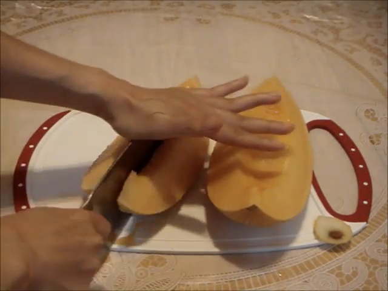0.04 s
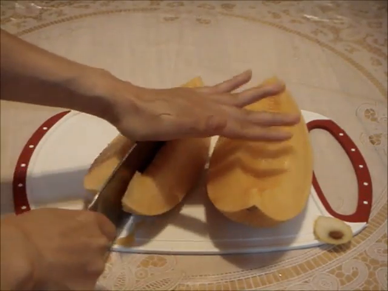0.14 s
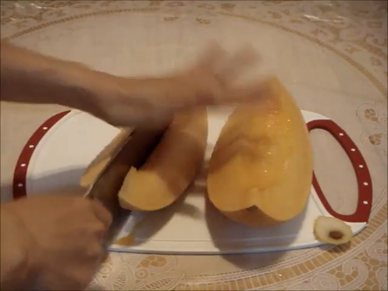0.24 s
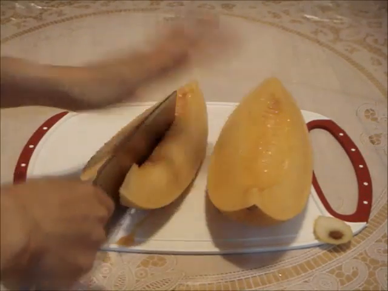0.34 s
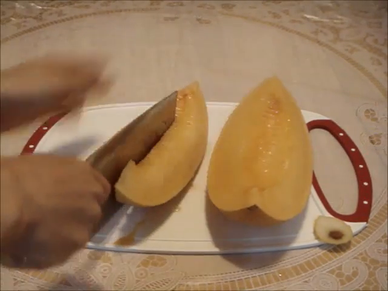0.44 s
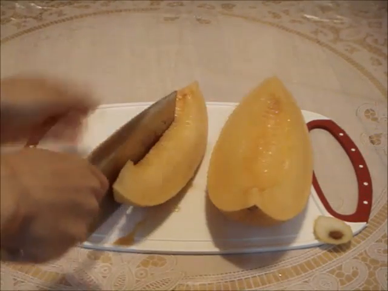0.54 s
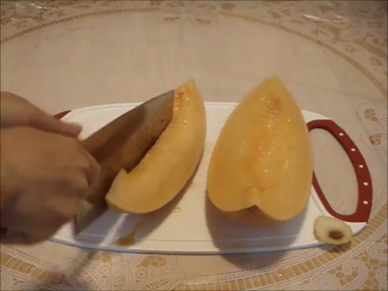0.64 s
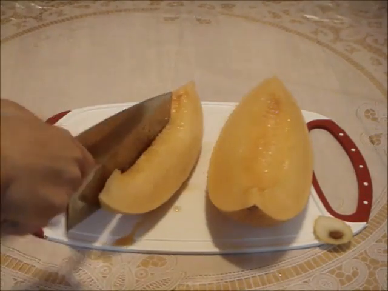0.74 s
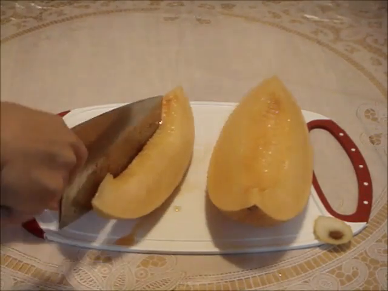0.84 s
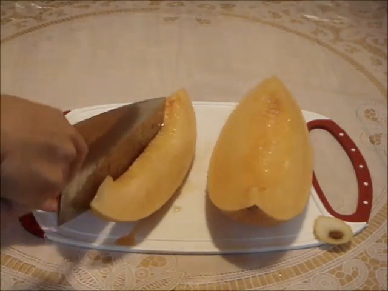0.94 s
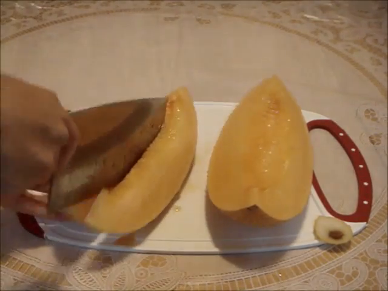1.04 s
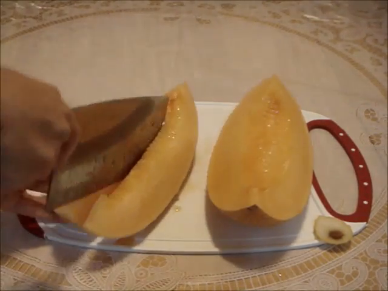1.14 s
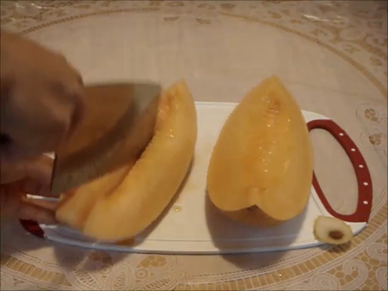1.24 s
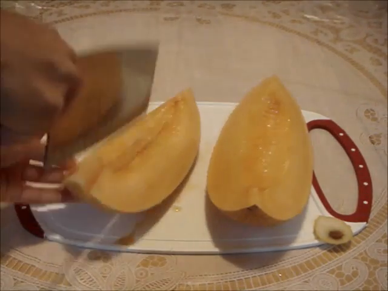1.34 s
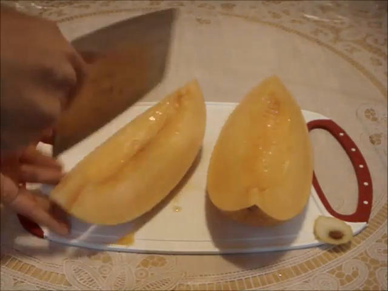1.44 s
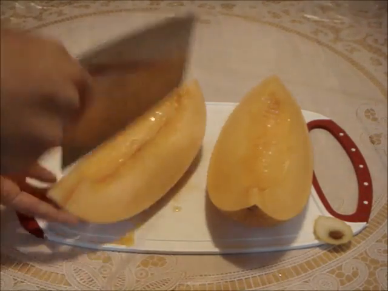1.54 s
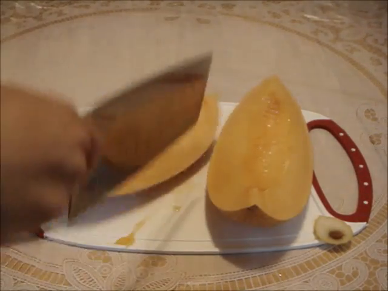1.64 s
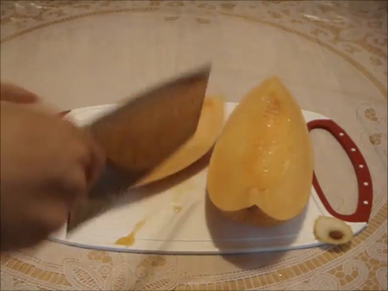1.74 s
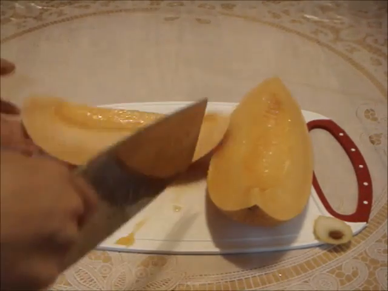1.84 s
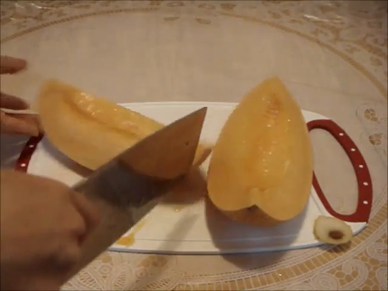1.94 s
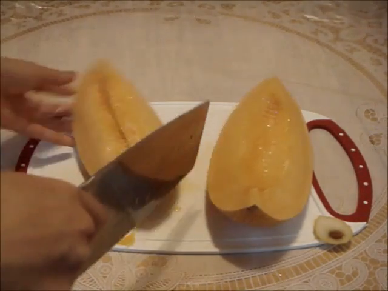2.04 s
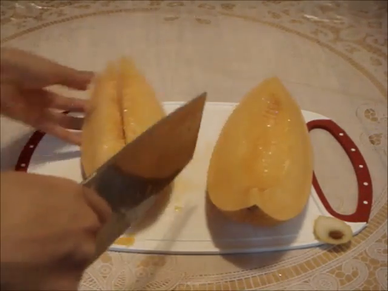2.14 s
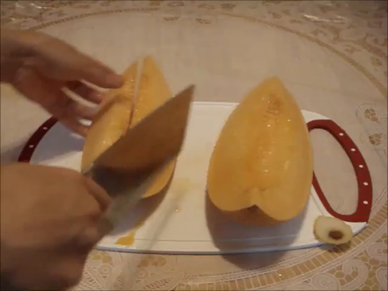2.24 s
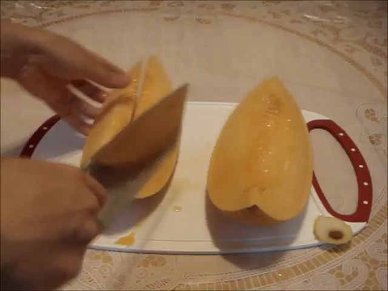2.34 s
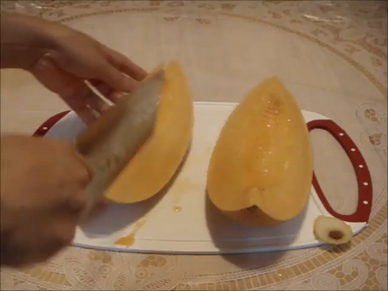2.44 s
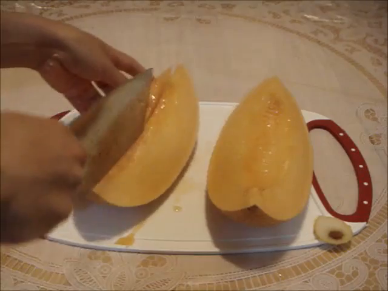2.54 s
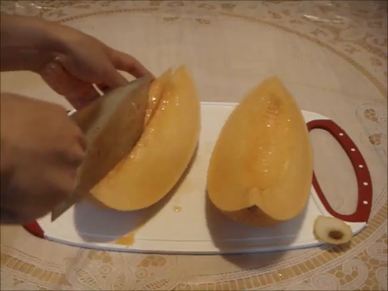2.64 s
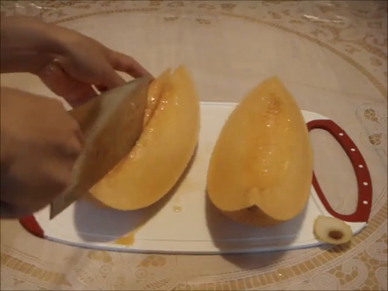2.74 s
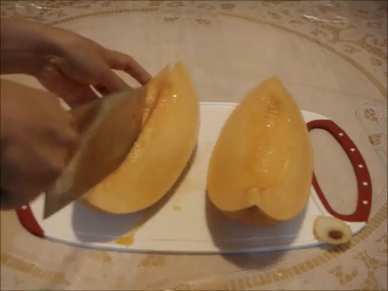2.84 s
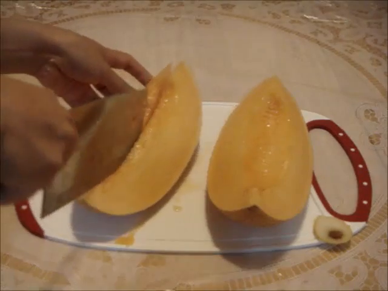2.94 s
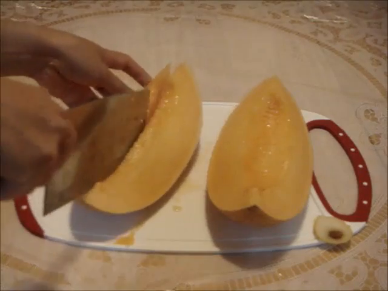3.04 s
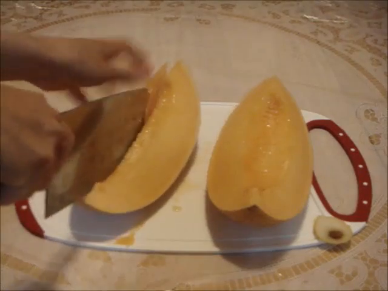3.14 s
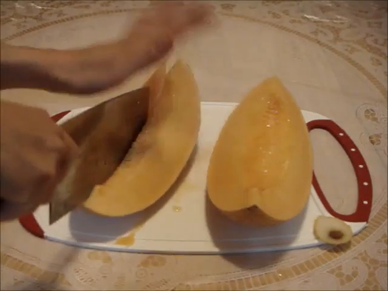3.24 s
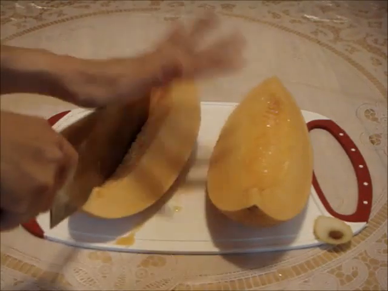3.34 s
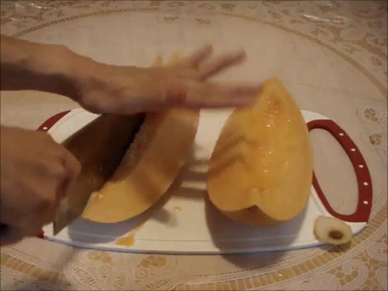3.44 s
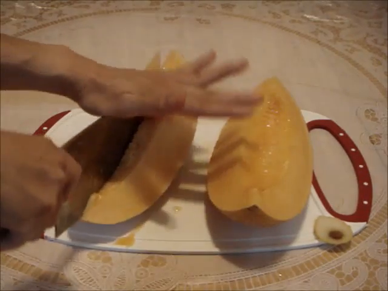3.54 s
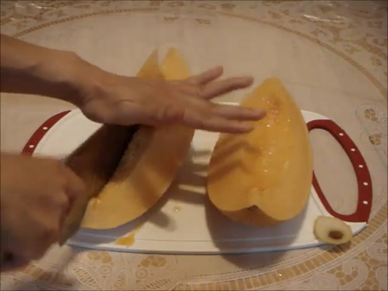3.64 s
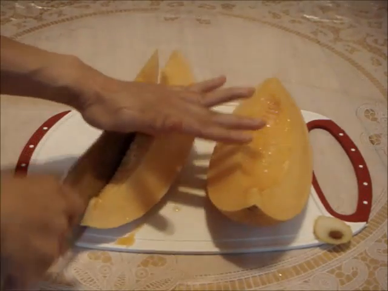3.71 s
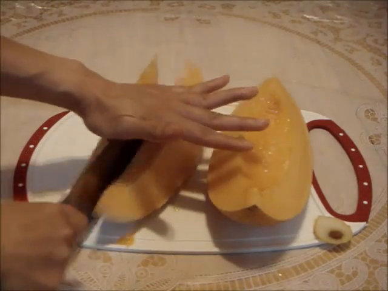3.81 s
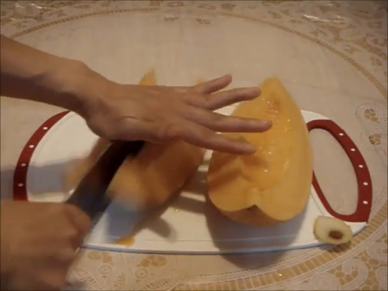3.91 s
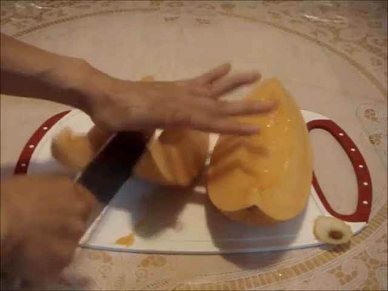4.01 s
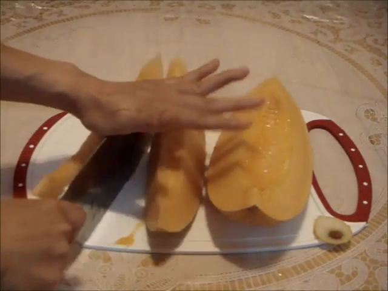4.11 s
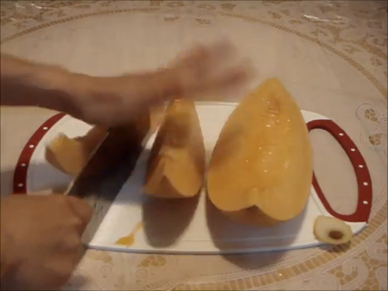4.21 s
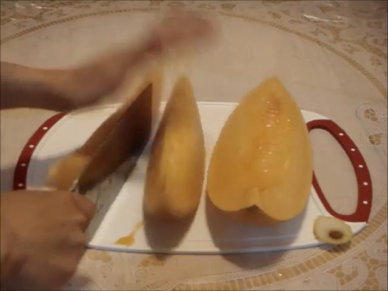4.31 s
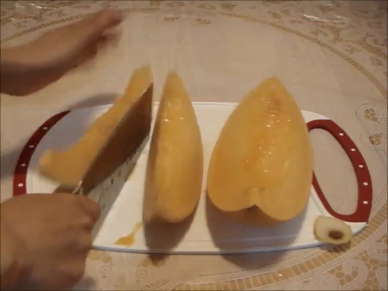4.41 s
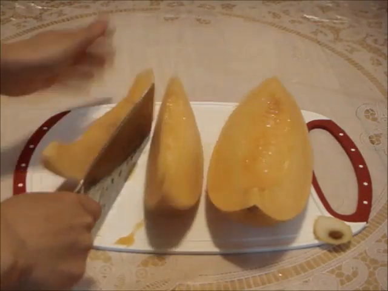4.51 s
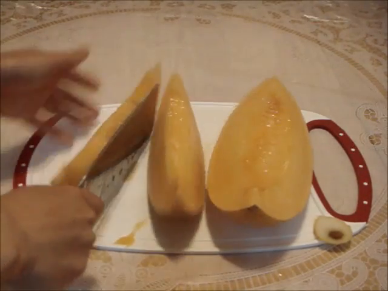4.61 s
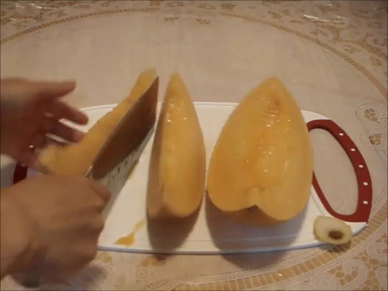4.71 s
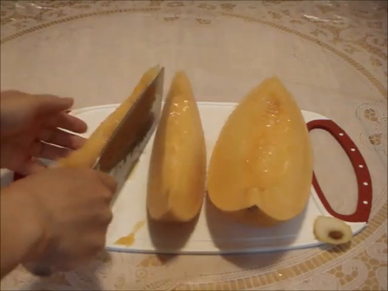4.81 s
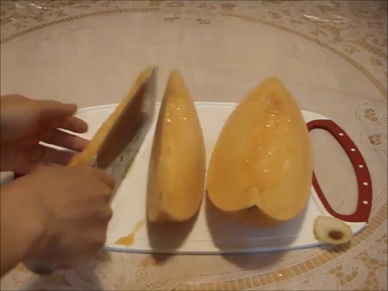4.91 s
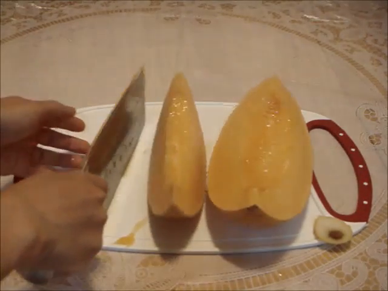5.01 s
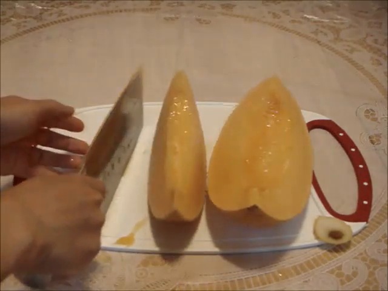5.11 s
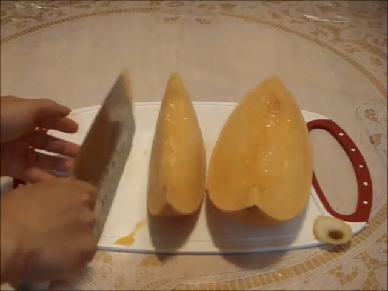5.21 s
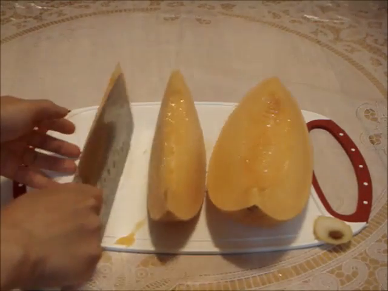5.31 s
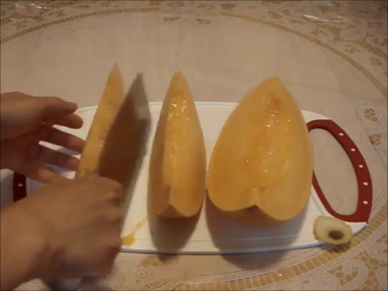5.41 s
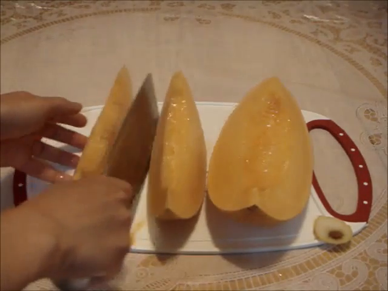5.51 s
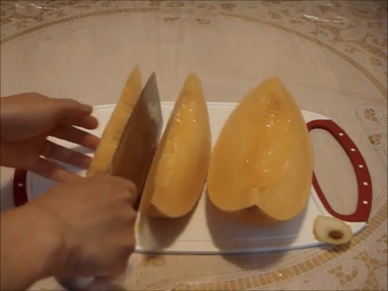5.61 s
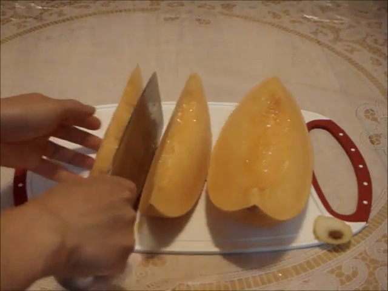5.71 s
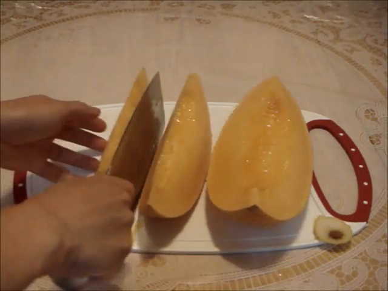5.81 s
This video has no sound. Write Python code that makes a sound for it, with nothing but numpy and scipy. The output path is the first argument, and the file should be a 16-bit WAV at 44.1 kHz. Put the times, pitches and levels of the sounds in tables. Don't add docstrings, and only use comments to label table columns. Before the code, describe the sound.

A broad knife cuts melon on a plastic board on a table in an echoing kitchen, heard close through a small camera microphone with steady soft hiss and dull upper treble. At 0 s a loud chop is already dying away, a woody mid-range knock with low table hum and short room echo. From about 0.35 to 2.2 s there is only quiet handling: sparse dry ticks, clustered around 0.7 and 1.6 s, and faint wet rubs. A near-quiet gap follows. From 3.4 s soft table thumps begin; flesh tears lightly, a knock lands at 3.65, and the rind cracks with a crisp, crunchy burst peaking near 3.85. At 4.15 the edge lands in a quick double tap with a soft slide. From 4.7 s the edge drags over the board in short, gritty strokes, hissing plastic and thin singing steel, strongest around 5.0 and 5.45 s, the last falling in pitch and fading by 5.7.

```python
import sys
import numpy as np
from scipy import signal
from scipy.fft import rfft, irfft
from scipy.io import wavfile
from scipy.ndimage import uniform_filter1d

SR = 44100
rng = np.random.default_rng(int(sys.argv[2]) if len(sys.argv) > 2 else 0)


def elevation(decibels):
    levels = np.asarray(decibels, float)
    return 10 ** (levels / 20)


def generate_wav(signal):
    frames = np.transpose(np.atleast_2d(signal))
    scaled = np.clip(frames, -1, 1) * 32767
    pcm = np.round(scaled).astype(np.int16)
    wavfile.write(sys.argv[1], SR, pcm)


N = 258426
LEAD_S = 0.1
CHOP_S, CHOP_THUMP_DB = -0.02, -14

# f/Hz, level/dB
CHOP_COLOUR = [(120, -49), (350, -1), (550, -3), (800, 2.5), (1100, -0.5), (1500, -8), (2000, -7),
               (2600, -14.5), (4500, -15), (9800, -32.5), (12000, -75)]
# f/Hz, level/dB, T60/s
TABLE_MODES = [(130.9, 0, 0.51), (159.8, 2, 0.27), (233.5, -18.5, 0.68)]
# f/Hz, level/dB, T60/s
BOARD_MODES = [(257.3, -9, 0.15), (352.2, -1.5, 0.072), (489, -3.5, 0.044), (620, -3.5, 0.062),
               (769, -3.5, 0.036), (875, -6, 0.03)]
# t/s, level/dB
JOLTS = [
    (0.0, -38),
    (0.15, -49),
    (0.614, -62),
    (3.66, -77),
    (3.902, -47.5),
    (4.168, -44.5),
    (4.67, -68),
    (4.856, -68),
]
# t/s, thump level/dB
NUDGES = [(3.401, -55), (3.799, -34), (3.882, -31), (4.23, -32), (4.584, -50.5), (4.985, -46), (5.1, -48),
          (5.207, -52.5), (5.288, -67), (5.435, -48), (5.519, -46), (5.606, -39.5)]
# f/Hz, T60/s
ROOM_DECAY = [(60, 0.23), (200, 0.57), (700, 0.63), (3000, 0.58), (6000, 0.53), (10000, 0.34)]
# f/Hz, level/dB
HISS_COLOUR = [(24, -49), (40, -9), (325, -2), (391, -3.5), (492, -4.5), (527, -3.5), (564, -4.5),
               (2410, -11.5), (6180, -15), (9800, -22), (12700, -60), (21600, -120)]
# t/s, level/dB, f/Hz
TICKS = [(0.3544, -33, 3200), (0.6753, -33, 2600), (0.7434, -35, 2970), (0.79, -44, 4210),
         (1.1795, -36.5, 2050), (1.3037, -36.5, 2940), (1.4492, -42, 2370), (1.5685, -31, 1540),
         (1.6204, -30.5, 1680), (1.648, -37, 1500), (2.0394, -50, 2310), (2.1586, -50, 2150),
         (3.595, -28, 3900), (3.744, -30, 2850), (3.795, -14, 2310), (4.3894, -36.5, 2150),
         (4.6986, -43, 2170)]
# t/s, length/s, level/dB
RUBS = [
    (0.662, 0.056, -44.5),
    (0.845, .11, -45),
    (1.411, .11, -49.5),
    (1.577, 0.073, -53),
    (1.745, .18, -44),
    (4.135, .18, -42),
]
# f/Hz, level/dB
RUB_COLOUR = [(500, -13), (1500, 3.5), (3500, 4), (6500, 0), (9000, -13), (11000, -41)]
# t/s, force level/dB
TEARS = [
    [(3.45, -54.5), (3.574, -55.5), (3.65, -38), (3.7, -51.5)],
    [(3.7, -52), (3.75, -37), (3.79, -37.5), (3.80, -28.5), (3.83, -29), (3.848, -15.5), (3.864, -13),
     (3.888, -24), (3.93, -46)],
]
# f/Hz, level/dB
RIND_COLOUR = [(88, -52), (150, -63), (360, 1.5), (444, -26.5), (620, -8.5), (776, -4.5), (1100, -4.5),
               (1960, -10), (3950, -8.5), (7540, -12), (9800, -25), (12700, -47), (21600, -120)]
# t/s, edge tick level/dB, table thump level/dB, board knock level/dB, tick f/Hz
BLOWS = [
    (3.657, -21.5, -26, -28.5, 2300),
    (4.146, -36, -38, -37, 2530),
    (4.166, -24, -26, -27, 2620),
]
# t/s, pressure level/dB
DRAGS = [
    [(4.68, -54.5), (4.786, -44), (4.838, -41.5), (4.874, -39), (4.95, -50.5)],
    [(4.95, -54.5), (4.97, -46), (5.0, -32.5), (5.025, -30.5), (5.064, -50), (5.12, -42), (5.2, -50.5)],
    [(5.19, -48), (5.222, -44.5), (5.3, -42.5), (5.345, -51.5)],
    [(5.414, -64), (5.428, -33), (5.45, -23.5), (5.49, -29), (5.514, -30), (5.6, -31), (5.7, -62.5)],
]
# held ring level/dB, free ring level/dB, start scrape f/Hz, end scrape f/Hz
GRIPS = [
    (-10.5, -25, 1750, 1700),
    (-9, -8, 1660, 2400),
    (-6.5, -28, 1800, 1800),
    (-11.5, -15.5, 3160, 830),
]
# f/Hz, level/dB
SCRAPE_COLOUR = [(300, -37), (600, -12), (1000, -0.5), (1600, -2.5), (3300, -3.5), (4500, -8.5),
                 (5300, -12.5), (7700, -15.5), (9800, -27), (12000, -74)]
# f/Hz, width/Hz, level/dB
HELD_MODES = [(3366, 47, -0.5), (4400, 41, -13), (6070, 43, -11), (6250, 23, -11), (7730, 39, -12),
              (7620, 83, -16.5), (2054, 41, -11)]
# f/Hz, width/Hz, level/dB
FREE_MODES = [(2802, 9.4, 3.5), (4610, 18, -13), (4695, 29, -4), (5830, 80, -15), (6850, 45, -22),
              (8570, 40, -24)]
# t/s, board weight level/dB, length/s
LEANS = [
    (4.72, 1, 0.14),
    (4.977, 4, 0.033),
    (5.11, 0.5, 0.17),
    (5.284, 1.5, 0.19),
    (5.554, -7, 0.15),
]


def evened(x):
    return x / np.sqrt(np.mean(x ** 2) + 1e-20)


def read(points, hz):
    f, value = np.transpose(points)
    return np.interp(np.log(hz + 1), np.log(f + 1), value)


def silence():
    return np.zeros(N + round(LEAD_S * SR))


def add(mix, s, sound):
    part = mix[round((s + LEAD_S) * SR):][:len(sound)]
    part += sound[:len(part)]


def unroll(rows):
    s, level_db = np.transpose(rows)
    t = np.arange(s[0], s[-1], 1 / SR)
    return s[0], np.interp(t, s, level_db), signal.windows.tukey(len(t), 400 / len(t))


def band(x, order, edges_hz):
    return signal.sosfilt(signal.butter(order, edges_hz, "band", fs=SR, output="sos"), x)


def coloured(x, spectrum):
    gain = elevation(read(spectrum, np.fft.rfftfreq(len(x), 1 / SR)))
    return evened(irfft(rfft(x) * gain, len(x)))


def wander(size, smooth):
    return evened(uniform_filter1d(rng.standard_normal(size), smooth))


def grit(size, per_s, spread_db):
    heights = elevation(spread_db * np.minimum(rng.exponential(1, size), 4)) * rng.standard_normal(size)
    return evened(heights * (rng.random(size) < per_s / SR))


def resonate(x, hz, width):
    r, turn = np.exp(-np.pi * width / SR), 2 * np.pi * hz / SR
    return signal.lfilter([1 - r], [1, -2 * r * np.cos(turn), r * r], x) * 2 * np.sin(turn)


def glide(x, hz, width):
    turn = np.exp(2j * np.pi * np.cumsum(hz) / SR)
    r = np.exp(-np.pi * width / SR)
    return 2 * (turn * signal.lfilter([1 - r], [1, -r], x / turn)).real


def ring(modes, spread_db):
    t = np.arange(SR // 2) / SR
    return sum(elevation(db + spread_db * rng.standard_normal() - 60 * t / t60) * np.sin(2 * np.pi * hz * t)
               for hz, db, t60 in modes)


def chop():
    out, t = silence(), np.arange(SR // 4) / SR
    slam = coloured(rng.standard_normal(len(t)), CHOP_COLOUR)
    add(out, CHOP_S - 0.03, elevation(-1.5 - 60 * t / 0.23) * slam)
    add(out, CHOP_S, elevation(-9.5) * ring(BOARD_MODES, 0))
    return out


def table():
    out = silence()
    rise = 1 - np.exp(-np.arange(SR // 2) / SR / 0.0038)
    thumps = [(CHOP_S, CHOP_THUMP_DB)] + [(blow[0], blow[2]) for blow in BLOWS] + NUDGES
    for s, thump_db in thumps:
        add(out, s, elevation(thump_db - 0.5) * rise * ring(TABLE_MODES, 0.24))
    return out


def shake():
    rest_db, wobble_db = -78, 3.5
    rise_db_per_s, fall_db_per_s = 245, 88.5
    t = np.arange(N) / SR
    level = elevation(rest_db + wobble_db * wander(N, 4000))
    for s, db in JOLTS:
        away_db = np.where(t < s, rise_db_per_s * (s - t), fall_db_per_s * (t - s))
        level = level + elevation(db - away_db)
    rumble = [(10, -20), (25, 14.5), (45, -3), (85, -0.5), (115, -41), (300, -76)]  # f/Hz, level/dB
    return level * coloured(rng.standard_normal(N), rumble)


def room(x):
    turn, out = 2 * np.pi * np.arange(len(x)) / SR * 7, np.zeros(len(x))
    for k in range(3):
        taps = np.zeros(SR)
        at = np.arange(200, SR - 12, 12) + rng.integers(0, 12, (SR - 201) // 12)
        taps[at] = rng.choice([-1., 1.], len(at))
        hz, t, z = signal.stft(taps, SR, nperseg=256)
        decay = elevation(-60 * t / read(ROOM_DECAY, hz)[:, None])
        tail = signal.istft(z * decay, SR, nperseg=256)[1]
        share = np.sqrt(2 / 3) * np.cos(turn + k * np.pi / 3)
        out += signal.fftconvolve(x * share, tail / np.linalg.norm(tail))[:len(x)]
    return out


def hiss():
    flicker = elevation(0.5 * wander(N, 1500))
    return elevation(-51.5) * flicker * coloured(rng.standard_normal(N), HISS_COLOUR)


def ticks():
    octaves, snap = 1.17, 4.5
    out, t = silence(), np.arange(4000) / SR
    decay = elevation(-60 * t / 0.0084) + 0.13 * elevation(-60 * t / 0.063)
    for s, db, hz in TICKS:
        edges_hz = np.clip(hz * 2. ** np.array([-octaves, octaves]), 300, 9900)
        puff = band(snap * (t == 0) + rng.standard_normal(len(t)), 3, edges_hz)
        add(out, s, elevation(db - 8) * decay * evened(puff))
    return out


def rubs():
    peak_share, ends_db = 0.26, -16
    out = silence()
    for s, length, db in RUBS:
        u = np.linspace(0, 1, round(length * SR))
        arch = np.interp(u, [0, peak_share, 1], [1, 0, 1]) ** 2
        slide = coloured(grit(8000, 9000, 0.73), RUB_COLOUR)[:len(u)]
        add(out, s, elevation(db - 9.5 + ends_db * arch) * slide)
    return out


def tearing():
    out = silence()
    for rows in TEARS:
        s, force_db, ends = unroll(rows)
        after_s = np.maximum(np.arange(len(ends)) - force_db.argmax(), 0) / SR
        below_db = np.minimum(force_db.max() - force_db, 25)
        dull_db = -3.5 + 0.4152 * below_db + 161 * after_s
        cracks = grit(len(ends), 16000, 1.6)
        body = resonate(cracks, 1280, 420) + 3.2 * resonate(cracks, 640, 300)
        body = evened(body + 0.25 * resonate(cracks, 410, 80))
        snap = evened(resonate(cracks, 3970, 1400))
        rip = coloured(cracks, RIND_COLOUR) + 0.35 * snap + 0.31 * elevation(dull_db) * body
        add(out, s, elevation(force_db - 5) * ends * rip)
    return out


def blows():
    out, t = silence(), np.arange(900) / SR
    for s, tick_db, _, knock_db, hz in BLOWS:
        s = s + 0.0012
        add(out, s, elevation(knock_db + 2) * ring(BOARD_MODES, 2))
        contact = (t == 0) + 0.22 * rng.standard_normal(len(t)) * elevation(-60 * t / 0.049)
        tick = band(contact, 2, [500, hz])
        add(out, s, elevation(tick_db + 1) * tick / abs(tick).max())
    return out


def leaning(t):
    bells = sum(elevation(db) * np.exp(-(4 * (t - s) / length) ** 2 / 2) for s, db, length in LEANS)
    return elevation(-19.5) + bells


def blade(drive, modes, bend):
    out = 0
    for k, (hz, width, db) in enumerate(sorted(modes)):
        once = glide(drive, hz * bend, width)
        out = out + (-1) ** k * elevation(db) * glide(once, hz * bend, 900)
    return out


def drags():
    out, after = silence(), (0, SR // 3)
    for rows, (held_db, free_db, from_hz, to_hz) in zip(DRAGS, GRIPS):
        s, pressure_db, ends = unroll(rows)
        hz, t = np.geomspace(from_hz, to_hz, len(ends)), np.arange(len(ends)) / SR
        chatter = elevation(1.6 * wander(SR // 2, 300))[:len(ends)]
        slips = grit(SR // 2, 14000, 1.8)[:len(ends)]
        push = chatter * elevation(pressure_db - 5.5) * ends
        scrape = evened(glide(glide(slips, 0.92 * hz, 1500), 0.87 * hz, 1600))
        add(out, s, push * (0.75 * coloured(slips, SCRAPE_COLOUR) + 0.49 * scrape))
        flex = np.pad(1 - 0.0013 * (np.clip(pressure_db, -48, -25) + 30.5), after, "edge")
        held = np.pad(slips * push * elevation(held_db + 31.5 - 24.5 * t), after)
        free = np.pad(slips * push * elevation(free_db + 36.5 - 53 * t), after)
        add(out, s, blade(held, HELD_MODES, flex))
        add(out, s, blade(free, FREE_MODES, flex ** 0.065))
        drive = np.pad(slips * push * elevation(22) * leaning(s + t), after)
        add(out, s, sum(elevation(db) * resonate(drive, f, 0.69 / t60) for f, db, t60 in BOARD_MODES))
    return out


def scene():
    near = chop() + ticks() + rubs() + tearing() + blows() + drags()
    near = signal.sosfilt(signal.butter(4, 150, "high", fs=SR, output="sos"), near)
    heard = elevation(2) * near + elevation(-2) * room(near) + table()
    return (heard[-N:] + shake())[None]


def thin_out(x):
    hz, _, z = signal.stft(x, SR, window="cosine", nperseg=384, noverlap=192)
    power = abs(z[:192].reshape(48, 4, -1)) ** 2
    band_db = 10 * np.log10(power.mean(1) + 1e-20)
    usual_db = uniform_filter1d(band_db, size=9, axis=1)
    coming_db = np.pad(usual_db[:, 4:], ((0, 0), (0, 4)), "edge")
    margin_db = np.interp(hz[:192:4], [2000, 5000, 9500], [13, 4, 3.6])[:, None]
    short_db = np.maximum(usual_db, coming_db - 5) - margin_db - band_db
    z[:192] *= np.repeat(elevation(-np.clip(12 * short_db, 0, 20)), 4, axis=0)
    return signal.istft(z, SR, window="cosine", nperseg=384, noverlap=192)[1][:N]


def top_cut(x):
    return signal.sosfilt(signal.butter(12, 9950, fs=SR, output="sos"), x)


def record(dry):
    x = np.tanh((dry + hiss()) * 1.1) / 1.1
    lowpass = signal.firwin(801, 10050, window=("kaiser", 9), fs=SR)
    mix = signal.oaconvolve(thin_out(x[0])[None], lowpass[None], "same")
    return top_cut(mix)


dry = scene()
out = record(dry)
generate_wav(out)
```